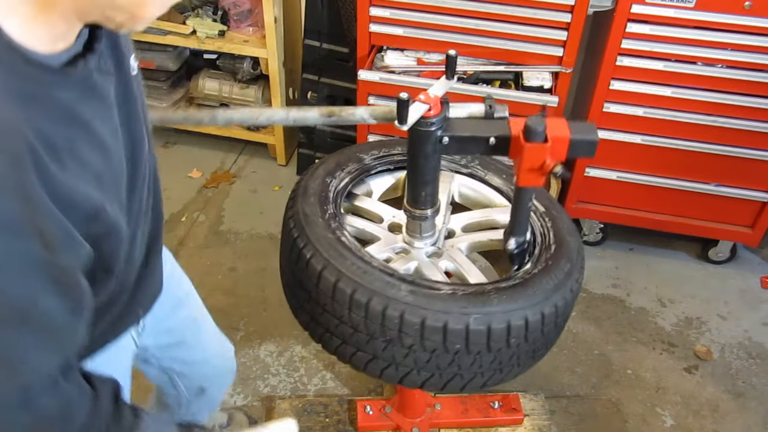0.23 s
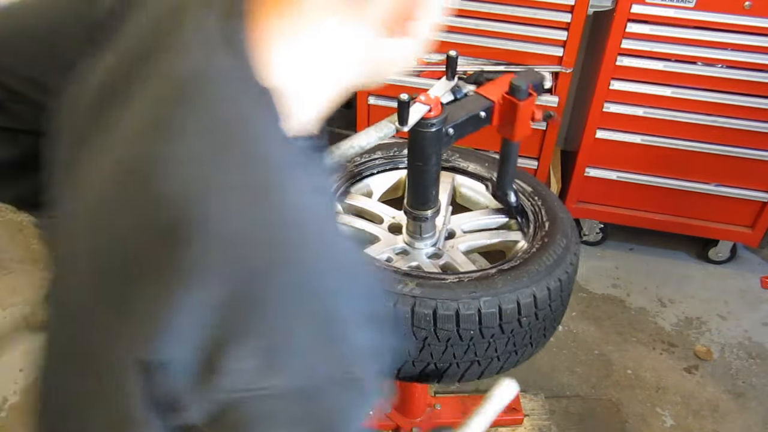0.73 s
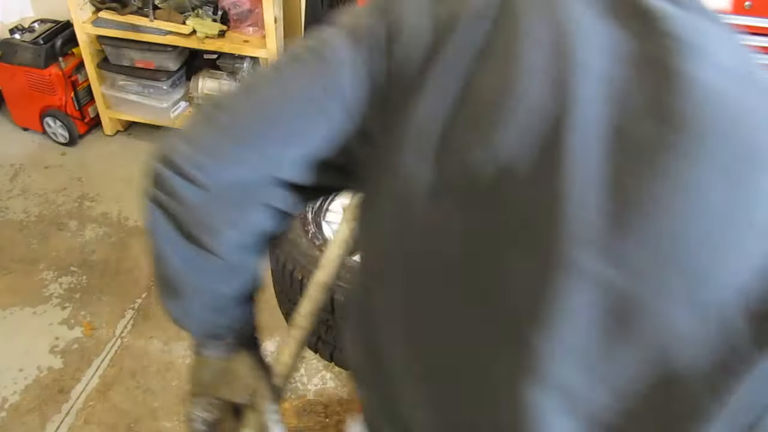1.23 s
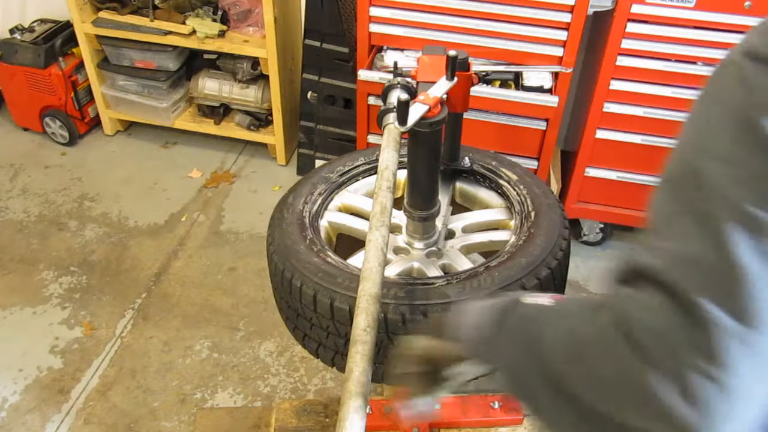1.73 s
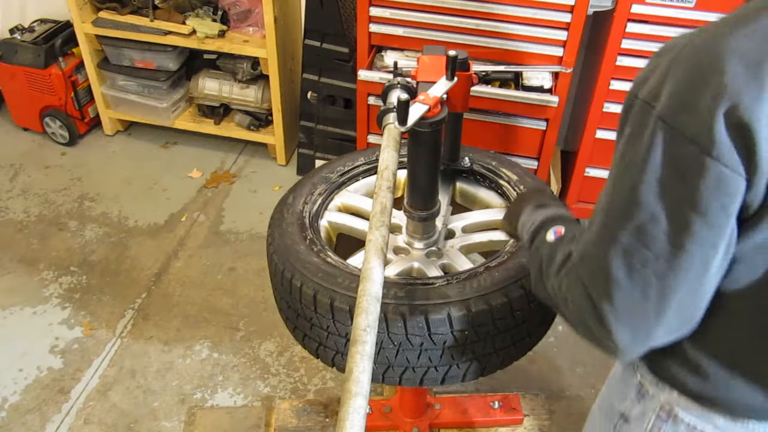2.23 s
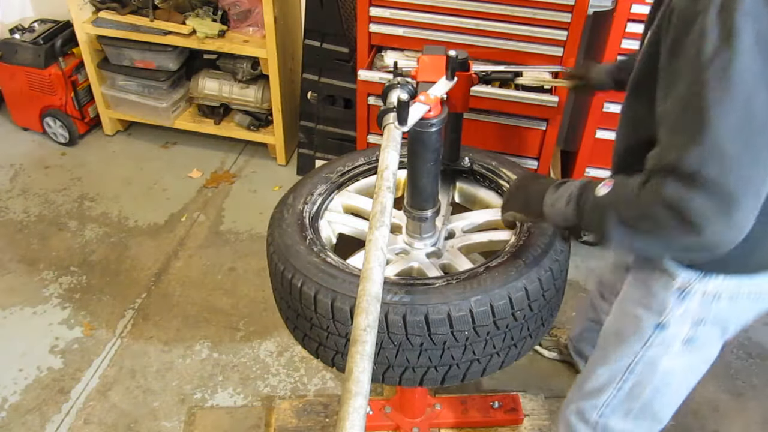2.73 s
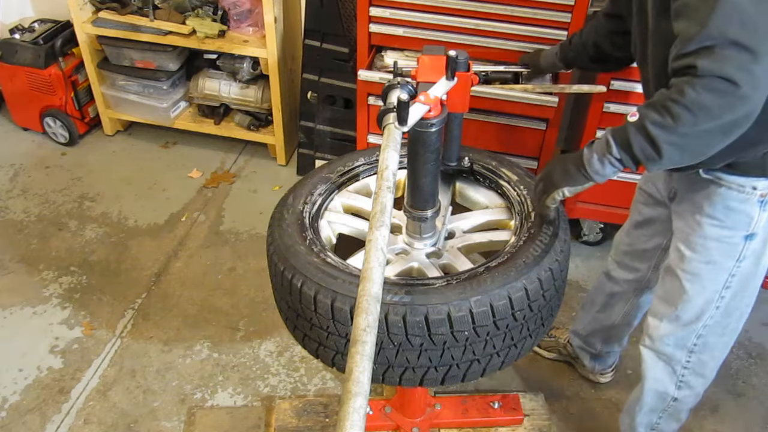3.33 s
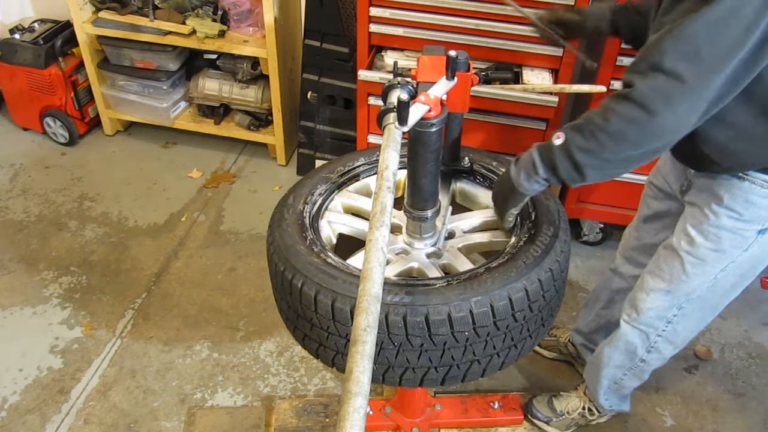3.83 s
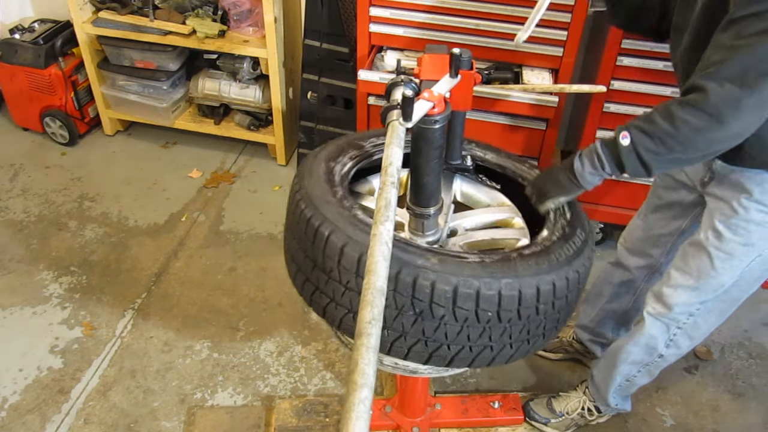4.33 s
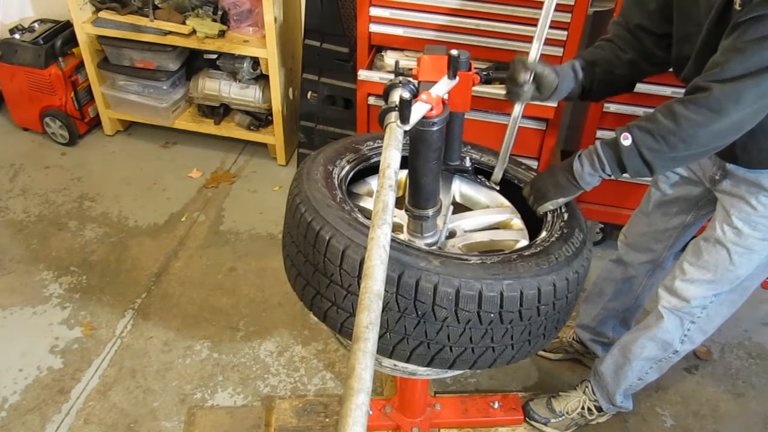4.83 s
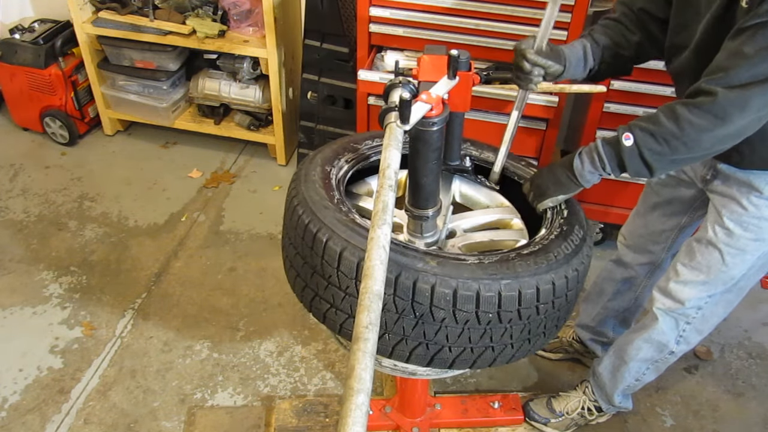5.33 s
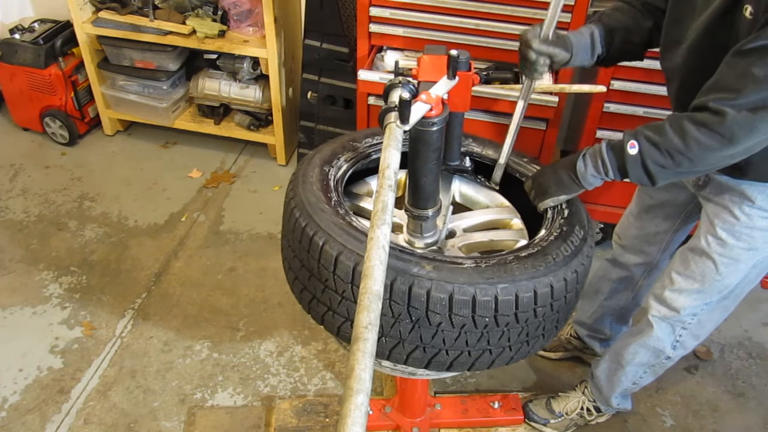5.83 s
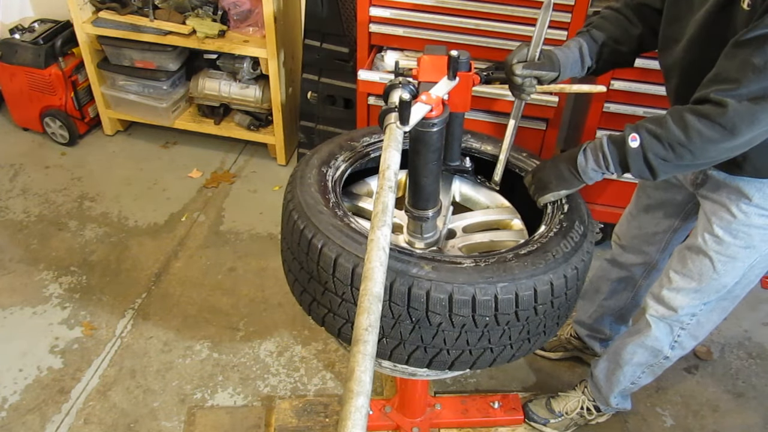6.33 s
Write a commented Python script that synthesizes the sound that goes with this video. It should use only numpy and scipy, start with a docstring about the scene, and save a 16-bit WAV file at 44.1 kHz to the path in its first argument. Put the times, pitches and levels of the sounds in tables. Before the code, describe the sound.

In a hard-walled garage, a steel bar rattles lightly and a tire thumps on its stand. Clothes rustle over a few soft steps. Tools then clatter loudly on a metal chest as an iron is taken. Rubber slides over the rim with a hiss, and the tire iron strikes the wheel with sharp, ringing clanks and dull thumps. The sounds are fairly close, with a short room echo.

```python
"""Working a tire off its rim

In a hard-walled garage steel pings lightly, and someone in rustling clothes takes an iron from a tool chest.
The rubber bead slides, the tire thumps and the iron clanks on the wheel. Struck metal rings in its normal
modes, friction hisses in many tiny slips, the room reverberates, and a limiter ducks the level after the hard
blows."""
import sys
import numpy as np
from scipy import signal
from scipy.fft import rfft, irfft
from scipy.io import wavfile
from scipy.ndimage import uniform_filter1d

SR = 44100
rng = np.random.default_rng(int(sys.argv[2]) if len(sys.argv) > 2 else 0)


def store_wav(level_fs):
    """Save 16-bit WAV to argv[1]."""
    pcm = np.round(np.clip(np.atleast_2d(level_fs), -1, 1) * 32767)
    wavfile.write(sys.argv[1], SR, pcm.T.astype(np.int16))


N = 290178
T = np.arange(N) / SR
EVENT_T = T[:round(1.5 * SR)]  # seconds since the onset of one event
EVENT_N = len(EVENT_T)


def tire_iron():
    """Bending vibration: the struck steel lever rings in inharmonic modes."""
    # Each row: frequency in Hz, level in dB.
    modes = [(408, -17.5), (526, -19), (872, -9), (1402, -3.5), (1630, -9.5), (1725, -5.5), (1993, -3),
             (2264, -9), (2534, -3.5), (2909, 5), (2961, -11), (3399, 1.5), (3457, -8.5), (3834, -8),
             (4320, -7.5), (4647, -16.5), (4792, -17), (4886, -9), (5935, -22), (6427, -17.5), (6625, -9.5),
             (6804, -11), (7577, -4), (7727, -7), (8027, -12), (8706, -5), (8888, -2), (9526, -6.5),
             (9989, -14.5), (10110, -6)]
    # Each row: start in seconds, strength and crack in dB, tilt in dB an octave,
    # chatter in dB, chatter decay in seconds.
    strikes = [(4.907, -37, -3, -20, 8.5, 0.17), (4.992, -32, 4, 11, 2, .04),
               (5.0435, 15, -1.5, 2.5, 2, 0.0031), (5.734, -19.5, -1.5, -3, 2.5, 0.011),
               (5.772, -33.5, 3, -22, 2.5, .02)]
    return blows(strikes, modes, held_t60=0.059, free_t60=0.36, free_db=-11, damping=0.52, snap_s=0.011)


def wheel_rim():
    """Shell vibration: the alloy wheel rings with the iron wedged against it."""
    # Each row: frequency in Hz, level in dB.
    modes = [(412, -13.5), (536, -7), (834, -8.5), (932, -11), (1253, -3.5), (1438, -12), (1831, -3),
             (2033, -1), (2274, -1.5), (2344, -3), (2558, 2.5), (2887, 1), (2955, -1), (3012, -3),
             (3403, -3), (3661, -1.5), (3802, -1), (4323, 1), (4842, -6.5), (5373, -6), (5442, -2),
             (5971, -7), (6650, -4), (7208, -3.5), (7525, -19), (8328, -30), (9215, -21), (9542, -11),
             (10055, -31), (10118, -21)]
    # Each row: start in seconds, strength and crack in dB, tilt in dB an octave,
    # chatter in dB, chatter decay in seconds.
    strikes = [(5.735, -25, -11, -4.5, -6, 0.025), (5.994, -4.5, -5.5, -0.5, -2.5, 0.0062),
               (6.222, -29.5, -27, -7, 6.5, 0.0082), (6.5665, -29.5, -12, -1, -2.5, 0.0045)]
    return blows(strikes, modes, held_t60=0.063, free_t60=0.59, free_db=-1.5, damping=1, snap_s=0.0053)


def tool_chest():
    """Impact excitation: the chest and the tools lying on it ring together."""
    # Each row: frequency in Hz, level in dB.
    modes = [(354, -7), (537, -3.5), (624, -3.5), (671, -12.5), (763, -2), (808, -6), (1642, -6),
             (1772, -3.5), (1848, 0.5), (1890, -4), (1992, -11.5), (2134, -14.5), (2249, -4.5), (2635, -10),
             (2910, -6.5), (3113, 1.5), (3184, -7), (3265, -9), (3656, -27), (3700, 1), (4578, -8.5),
             (5430, -18)]
    # Each row: start in seconds, strength and crack in dB, tilt in dB an octave,
    # chatter in dB, chatter decay in seconds.
    strikes = [(2.718, -34.5, 2, -6.5, -2.5, 0.09), (2.8935, -5, 9.5, 1, -26, 0.004),
               (2.902, -10, -9, -2.5, 0, 0.043), (2.925, -17.5, -6.5, -3.5, 5.5, 0.13),
               (3.1975, -8.5, 6, -4.5, 3.5, 0.092), (3.243, -22, 8, -11.5, -17, 0.3),
               (3.495, -28, 4, -1.5, -23, .06)]
    return blows(strikes, modes, held_t60=0.039, free_t60=0.46, free_db=-2.5, damping=0.49, snap_s=0.0027)


def steel_pings():
    """Light contact excites high modes of a piece of steel: thin, bright pings."""
    # Each row: frequency in Hz, level in dB.
    modes = [(3440, -8.5), (3949, -12.5), (4158, -8.5), (6900, -9), (8181, -9), (8413, -4)]
    # Each row: start in seconds, strength and crack in dB, tilt in dB an octave,
    # chatter in dB, chatter decay in seconds.
    strikes = [(0.002, -35.5, -2.5, -0.5, 4, 0.012), (.1, -35, -23, -16, -6, 0.023),
               (.318, -44, -23, -14, -4.5, 0.012), (4.803, -47, -2.5, -24.5, -11, 0.006),
               (5.734, -20.5, -12, -24.5, 2.5, 0.011)]
    return blows(strikes, modes, held_t60=0.05, free_t60=0.26, free_db=-3, damping=0.3, snap_s=0.003)


def loose_iron():
    """Free vibration: an iron rings on as it lifts off the chest."""
    # Each row: frequency in Hz, level in dB.
    modes = [(3542, -2), (4430, 0), (4845, -3), (5297, -2), (8559, -2), (9798, -8), (11500, -17),
             (13990, -28)]
    # Each row: start in seconds, strength and crack in dB, tilt in dB an octave,
    # chatter in dB, chatter decay in seconds.
    strikes = [(3.48, -23.5, -10, 0, -6, 0.019)]
    return blows(strikes, modes, held_t60=0.068, free_t60=0.53, free_db=-3, damping=0.3, snap_s=0.0033)


def blows(strikes, modes, held_t60, free_t60, free_db, damping, snap_s):
    """Contact damping: metal rings briefly while held, chatters, and sings longer when free."""
    impacts, singing = np.zeros((2, N))
    bounces_per_s = 1200
    for start, db, crack_db, tilt, chatter_db, chatter_s in strikes:
        hit = ring(modes, held_t60, tilt) + amp(crack_db) * crack(tilt, snap_s)
        bounces = rng.standard_normal(EVENT_N) * (rng.random(EVENT_N) < bounces_per_s / SR)
        bounces *= np.exp(-EVENT_T / chatter_s)
        chatter = packet(signal.fftconvolve(hit, bounces)[:EVENT_N])
        add(impacts, start, amp(db) * (hit + amp(chatter_db) * chatter) * (EVENT_T < 1))
        add(singing, start, amp(db + free_db) * ring(modes, free_t60, tilt, damping))
    return np.array([impacts, singing])


def ring(modes, t60, tilt=0, damping=0):
    """Modal superposition: decaying sines start at a crest; damping shortens those above 3 kHz."""
    hz, db = np.transpose(modes)[:, :, None]
    mode_t60 = t60 * np.maximum(hz / 3000, 1) ** -damping
    t = EVENT_T[EVENT_T < 1.2 * mode_t60.max()]
    hardness_db = tilt * octaves(np.maximum(hz, 2000), 3000)
    waves = amp(db + hardness_db - 60 * t / mode_t60) * np.cos(2 * np.pi * hz * t)
    signs = rng.choice([-1, 1], hz.shape)
    return packet(np.pad((signs * waves).sum(0), (0, EVENT_N - len(t))))


def crack(tilt, decay):
    """A brief contact radiates a broad band: a noise burst, whitened so that it has no pitch."""
    # Each row: frequency in Hz, spectral density in dB.
    spectrum = [(60, -36), (400, -40.5), (1300, 4), (3000, 8), (5000, 6.5), (8000, 5.5), (10500, 7.5),
                (12500, -7), (16000, -40.5)]
    burst = rfft(rng.standard_normal(EVENT_N) * np.exp(-EVENT_T / decay))
    whitened = irfft(burst / (abs(burst) + 1e-9), EVENT_N)
    return packet(colour(whitened * np.exp(-EVENT_T / (2 * decay)), spectrum, tilt))


def dull_sounds():
    """Resonance bandwidth: the narrower the band, the clearer the pitch, from footfall to squeak."""
    # The tire on its stand. Each row: start in seconds, level in dB, centre in Hz, decay in seconds.
    thumps = [(0.0, -23, 294, 0.038), (.005, -29, 165, 0.051), (.01, -34, 40, 0.091),
              (0.2011, -35.5, 206, 0.047), (2.719, -35.5, 160, 0.016), (3.199, -31, 102, 0.2),
              (4.22, -43, 202, 0.091), (4.379, -40.5, 267, 0.078), (4.877, -37, 250, .033),
              (4.945, -46.5, 257, 0.044), (5.364, -29, 312, 0.078), (5.667, -22.5, 340, 0.078),
              (6.559, -43, 229, .03)]
    # Shoes on concrete. Each row: start in seconds, level in dB, centre in Hz.
    steps = [(.766, -42, 445), (1.361, -40.5, 523), (2.0095, -48, 287), (3.77, -44.5, 280),
             (4.384, -39.5, 908)]
    # The chest's panels. Each row: start in seconds, level in dB, centre in Hz, decay in seconds.
    booms = [(2.9, -9.5, 610, 0.025), (3.157, -11.5, 680, 0.044), (3.2, -9.5, 690, 0.1),
             (3.208, -18.5, 322, 0.08), (3.496, -28, 348, 0.017)]
    # Iron on the rim, muffled by rubber. Each row: start in seconds, level in dB.
    knocks = [(4.924, -41), (5.363, -25.5), (5.657, -19), (6.5667, -35.5)]
    # Rubber on the iron. Each row: start in seconds, level in dB, pitch in Hz.
    squeaks = [(4.971, -36, 993)]
    out = np.zeros(N)
    for start, db, hz, decay in thumps:
        add(out, start, amp(db) * thud(hz, width_octaves=0.61, decay=decay))
    for start, db, hz in steps:
        add(out, start, amp(db) * thud(hz, width_octaves=1.56, decay=0.032))
    for start, db, hz, decay in booms:
        add(out, start, amp(db) * thud(hz, width_octaves=0.36, decay=decay))
    for start, db in knocks:
        add(out, start, amp(db) * thud(centre_hz=1200, width_octaves=0.15, decay=0.006))
    for start, db, hz in squeaks:
        add(out, start, amp(db) * thud(hz, width_octaves=0.028, decay=0.055))
    return out


def thud(centre_hz, width_octaves, decay, stand_db=-4, stand_t60=0.48, skirt=2.3, soft_hz=5000):
    """Band-limited excitation: a soft blow shakes one band and the stand's modes within it."""
    # Modes of the tire cavity and steel stand. Each row: frequency in Hz, level in dB.
    stand = [(172, -5), (219, 3), (235, -1.5), (276, -4), (313, -4), (335, -1), (365, -7), (410, -13),
             (499, -7.5)]

    def band(f):
        """Resonance curve with weak deep bass."""
        peak = (1 + (octaves(f, centre_hz) / width_octaves) ** 2) ** (-skirt / 2)
        return peak * np.minimum(2 * f / centre_hz, 1) ** 2

    hz = np.fft.rfftfreq(EVENT_N, 1 / SR)
    noise = rfft(rng.standard_normal(EVENT_N))
    shaken = irfft(noise * band(hz) / (1 + (hz / soft_hz) ** 2), EVENT_N)
    excited = [(f, db + 20 * np.log10(band(f))) for f, db in stand]
    ring_db = stand_db + max(db for f, db in excited)
    return packet(shaken * np.exp(-EVENT_T / decay)) + amp(ring_db) * ring(excited, stand_t60)


def tire_bead():
    """Stick-slip friction: the rubber bead slides over the rim and along the iron."""
    # Each row: start, swell and fade in seconds, level in dB.
    strokes = [(4.068, 0.032, 0.14, -30), (4.39, 0.013, 0.093, -55), (4.9, 0.018, 0.066, -42)]
    # Each row: frequency in Hz, spectral density in dB.
    spectrum = [(180, -54.5), (300, -13), (537, -1.5), (593, -6), (787, -5.5), (1100, -4), (1610, -6),
                (1900, -2), (2400, 1.5), (3240, 6.5), (4910, -1), (7320, -8.5), (9880, -7), (14000, -56),
                (16000, -49)]
    return rub(strokes, spectrum, spread_db=3.5, slips_per_s=3500, hiss=0.46)


def glove():
    """Sliding friction: glove and sleeve brush over the work with a high swish."""
    # Each row: start, swell and fade in seconds, level in dB.
    strokes = [(.17, 0.023, .04, -38), (1.64, 0.054, 0.075, -44.5), (2.1, 0.055, 0.087, -52.5),
               (2.73, 0.055, 0.15, -42.5), (3.1, .04, 0.086, -22), (3.76, 0.024, 0.015, -38),
               (3.86, 0.045, 0.13, -42), (4.05, 0.046, 0.16, -31), (4.835, .02, 0.1, -54.5),
               (4.9, 0.076, .06, -38.5)]
    # Each row: frequency in Hz, spectral density in dB.
    spectrum = [(500, -20), (2000, -4), (5000, 0), (8000, 1.5), (10200, 4), (12500, -10.5), (16000, -28.5)]
    return rub(strokes, spectrum, spread_db=7, slips_per_s=3800, hiss=1.5)


def clothes():
    """Friction of cloth: each movement of the body makes a broadband rustle."""
    # Each row: start, swell and fade in seconds, level in dB.
    strokes = [(0.0, 0.026, 0.44, -41), (.45, 0.33, 0.64, -52), (.81, 0.038, 0.069, -42.5),
               (1.33, 0.15, 0.17, -44), (1.893, 0.01, 0.12, -46.5), (2.06, 0.055, .1, -53),
               (3.55, 0.18, 0.11, -45.5), (4.56, 0.087, 0.071, -53), (6.3, 0.34, .05, -46)]
    # Each row: frequency in Hz, spectral density in dB.
    spectrum = [(100, -3), (400, 1), (1200, 0.5), (3000, 3), (6000, -0.5), (10000, 2.5), (12500, -13),
                (16000, -47)]
    return rub(strokes, spectrum, spread_db=2.5, slips_per_s=3900, hiss=0.71)


def shoe_scuff():
    """Friction on a rough surface: a sole scuffs the concrete."""
    # Each row: start, swell and fade in seconds, level in dB.
    strokes = [(.81, 0.053, 0.093, -38)]
    # Each row: frequency in Hz, spectral density in dB.
    spectrum = [(290, -11), (500, -9.5), (678, -25), (946, -32), (1230, -12), (1790, -20), (2100, -7),
                (2730, -7.5), (4470, 0.5), (5240, -10.5), (10200, -21), (16000, -44)]
    return rub(strokes, spectrum, spread_db=3.5, slips_per_s=1500, hiss=0.72)


def rub(strokes, spectrum, spread_db, slips_per_s, hiss):
    """Friction noise: tiny uneven slips over a smooth hiss; overlapping strokes add in power."""
    level = np.sqrt(sum(stroke(*row) ** 2 for row in strokes))
    slips = rng.choice([-1, 1], N) * amp(spread_db * np.minimum(rng.exponential(1, N), 5))
    slips *= rng.random(N) < slips_per_s / SR
    return level * colour(unit(slips) + hiss * rng.standard_normal(N), spectrum)


def stroke(start, swell, fade, db, fade_shape=1.48):
    """Friction level follows sliding speed, which builds smoothly and then runs out."""
    speeding = np.sin(np.pi / 2 * np.clip((T - start) / swell, 0, 1)) ** 2
    slowing = np.exp(-(np.maximum(T - start - swell, 0) / fade) ** fade_shape)
    return amp(db) * speeding * slowing


def ticks():
    """Transients without resonance: small dry contacts of buckle, glove and rubber."""
    # Each row: start in seconds, level in dB, tilt in dB an octave.
    contacts = [(0.674, -48.5, -5), (1.2047, -45, -8), (1.4275, -38, 3), (3.845, -38.5, 1),
                (4.082, -35, 4.5), (4.11, -34.5, 0), (4.156, -29, -2), (4.4005, -38.5, -3.5),
                (4.642, -52, -12.5), (4.878, -46, -7.5), (4.908, -40.5, 6)]
    out = np.zeros(N)
    for start, db, tilt in contacts:
        add(out, start, amp(db) * crack(tilt, decay=0.0019)[EVENT_T < 1])
    return out


def garage(x, early_db=3, early_decay=0.0045, echoes_per_s=4000):
    """Reverberation: reflections from floor and cabinets merge into a tail that dies band by band."""
    # Each row: frequency in Hz, reverberation time in seconds.
    t60s = [(100, 0.47), (400, 0.72), (1200, 0.77), (3000, 0.8), (7000, 0.55), (12000, 0.32)]
    echoes = rng.choice([-1., 1.], EVENT_N) * (rng.random(EVENT_N) < echoes_per_s / SR)
    echoes *= (EVENT_T > 0.003) * (1 + amp(early_db) * np.exp(-EVENT_T / early_decay))
    hz, t, bands = signal.stft(echoes, SR, nperseg=256)
    tail = signal.istft(bands * amp(-60 * t / read(t60s, hz)[:, None]), SR, nperseg=256)[1]
    return signal.fftconvolve(x, tail / np.linalg.norm(tail))[:N]


def room_noise(noise_db=-55):
    """The noise floor: steady noise, a low hum and a thin whine that wavers by frequency modulation."""
    # Each row: frequency in Hz, spectral density in dB.
    spectrum = [(12, -34.5), (20, 1.5), (48, -18), (86, -5.5), (163, -11.5), (222, -5), (277, -10.5),
                (377, -11.5), (574, -14.5), (660, -12.5), (759, -17.5), (1120, -17), (6540, -23.5),
                (7950, -17.5), (16000, -34)]
    # Each row: frequency in Hz, rms level in dB.
    tones = [(43.1, -67), (7881, -72)]
    waver = 0.0015 * np.cumsum(unit(uniform_filter1d(rng.standard_normal(N), 900))) / SR
    hum = sum(amp(db) * np.sqrt(2) * np.sin(2 * np.pi * hz * (T + waver)) for hz, db in tones)
    return amp(noise_db) * colour(rng.standard_normal(N), spectrum) + hum


def amp(db):
    """Decibels to gain."""
    return 10 ** (np.asarray(db) / 20)


def unit(x):
    """Scales to an rms of 1."""
    return x / np.sqrt(np.mean(x ** 2) + 1e-20)


def packet(x):
    """Scales to the energy of 10 ms at an rms of 1."""
    return x * np.sqrt(SR / 100 / (np.sum(x ** 2) + 1e-20))


def read(points, hz):
    """Interpolates a table along log frequency."""
    f, value = np.transpose(points)
    return np.interp(np.log(hz + 1), np.log(f + 1), value)


def octaves(hz, centre_hz):
    """Distance in octaves."""
    return np.log2((hz + 1) / centre_hz)


def colour(x, spectrum, tilt=0):
    """Filters by a spectrum, tilted in dB an octave above 400 Hz, and scales to an rms of 1."""
    hz = np.fft.rfftfreq(len(x), 1 / SR)
    gain_db = read(spectrum, hz) + tilt * octaves(np.maximum(hz, 400), 3000)
    return unit(irfft(rfft(x) * amp(gain_db), len(x)))


def add(mix, start, sound):
    """Mixes a sound in at a start time in seconds."""
    part = mix[round(start * SR):][:len(sound)]
    part += sound[:len(part)]


def scene():
    """Superposition: direct sound, reverberation and room noise, alike in both channels."""
    iron, rim, chest = tire_iron(), wheel_rim(), tool_chest()
    bar, loose = steel_pings(), loose_iron()
    impacts, singing = iron + rim + chest + bar + loose
    friction = clothes() + glove() + shoe_scuff() + tire_bead()
    thuds = dull_sounds()
    clicks = ticks()
    # The chest stands by the wall, so its impacts feed the room most.
    room_impacts = amp(-4.5) * iron[0] + amp(-0.5) * rim[0] + chest[0] + amp(-2.5) * (bar[0] + loose[0])
    to_room = room_impacts + amp(-16) * singing + amp(-1) * thuds + amp(3) * clicks + amp(-3.5) * friction
    direct = amp(-4) * impacts + singing + thuds + clicks + friction
    mono = direct + garage(to_room) + room_noise()
    return np.array([mono, mono])


def record(dry, threshold_db=-15, attack_s=0.001, recovery_db_per_s=18, ceiling=0.85, edge_hz=15800):
    """Limiting: gain drops fast and recovers slowly; spikes saturate softly before a low-pass filter."""
    power_db = 10 * np.log10(abs(uniform_filter1d((dry ** 2).mean(0), size=120)) + 1e-12)
    recovery = recovery_db_per_s * T
    held_db = np.maximum.accumulate(power_db + recovery) - recovery
    over_db = np.maximum(held_db - threshold_db, 0)
    pole = np.exp(-1 / (attack_s * SR))
    ducked = dry * amp(-signal.lfilter([1 - pole], [1, -pole], over_db))
    saturated = ceiling * np.tanh(ducked / ceiling)
    low_pass = signal.firwin(511, edge_hz, window=("kaiser", 9), fs=SR)
    return signal.oaconvolve(saturated, low_pass[None], "same", axes=1)


dry = scene()
out = record(dry)
store_wav(out)
```